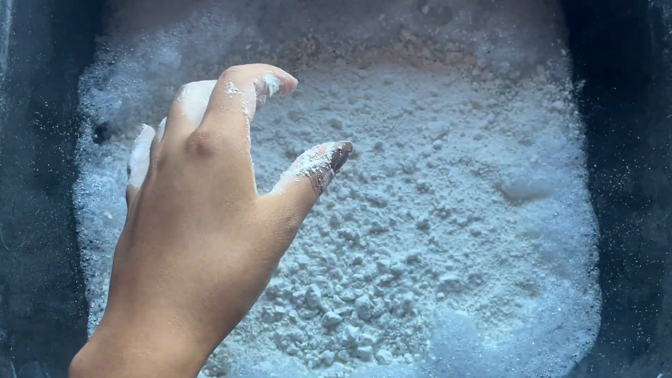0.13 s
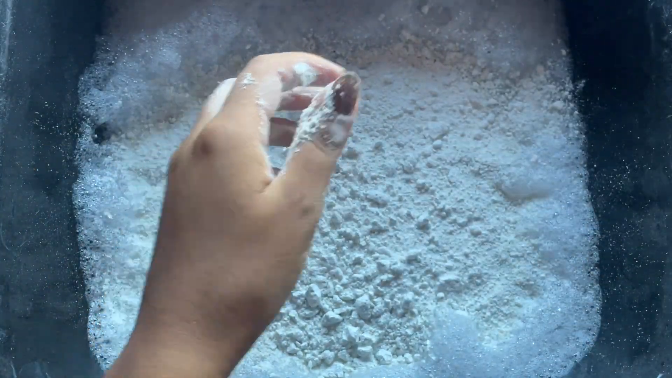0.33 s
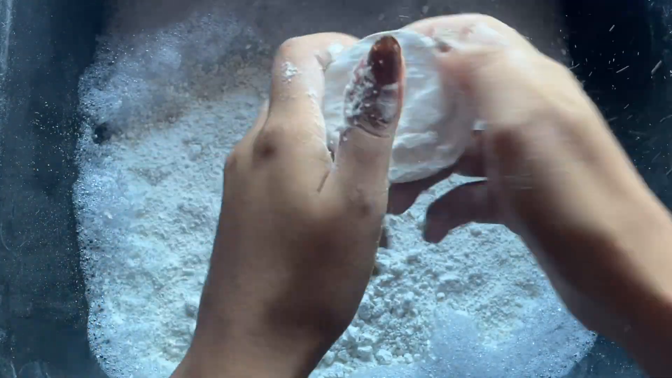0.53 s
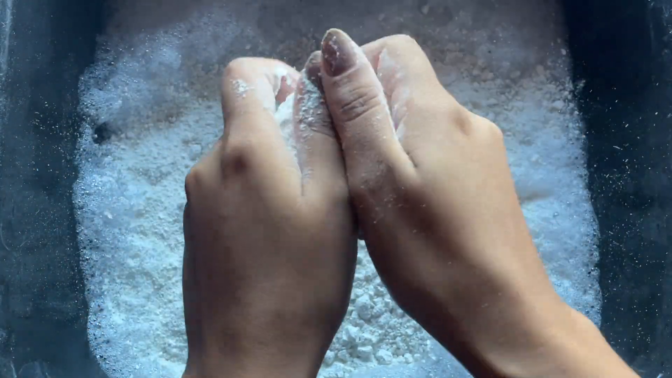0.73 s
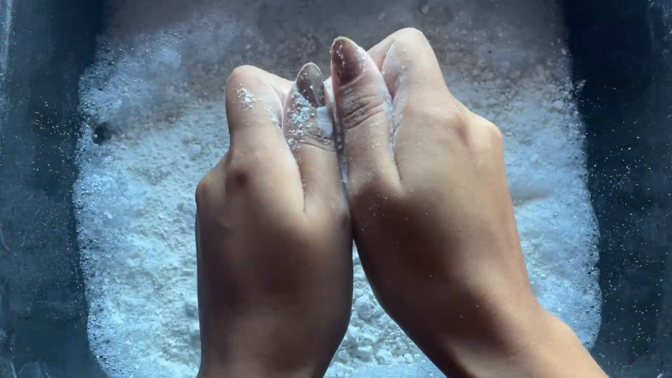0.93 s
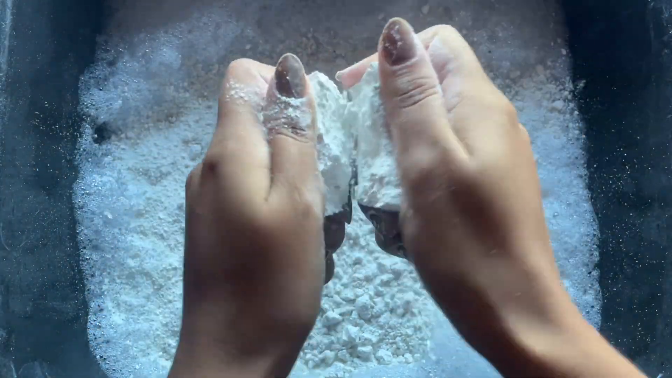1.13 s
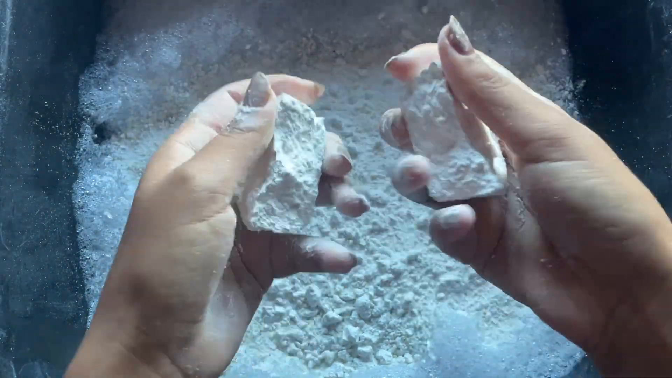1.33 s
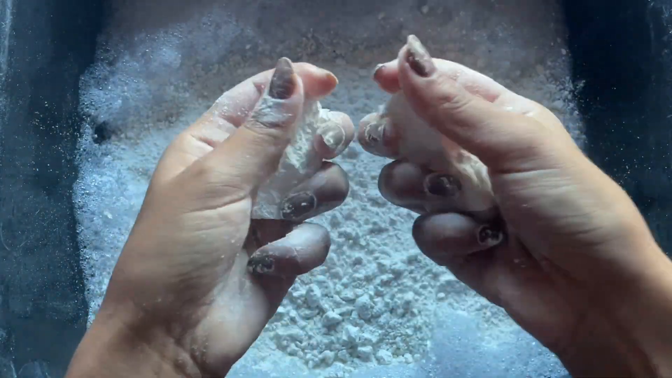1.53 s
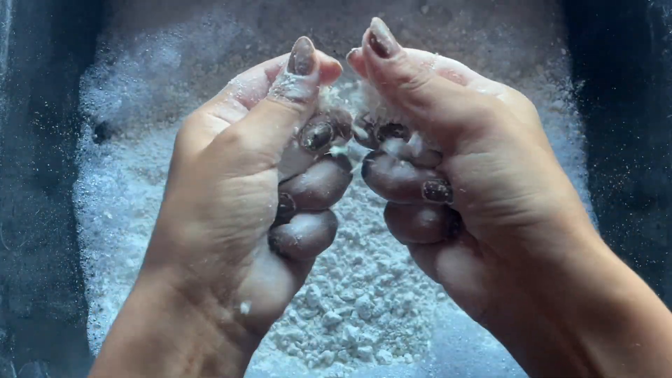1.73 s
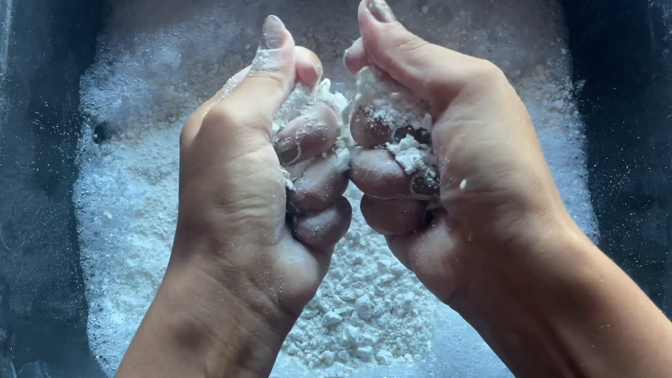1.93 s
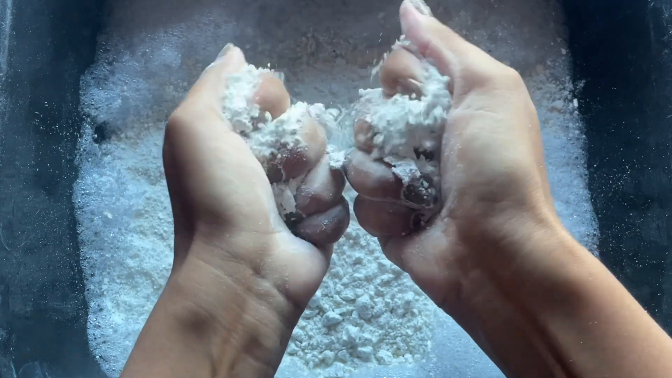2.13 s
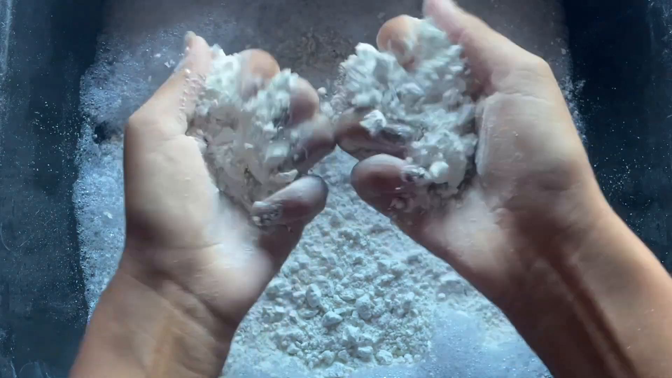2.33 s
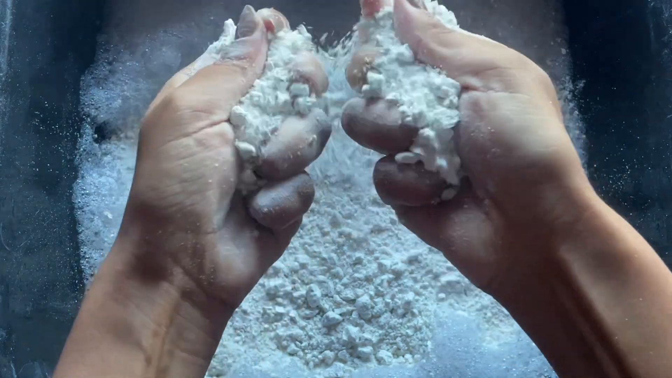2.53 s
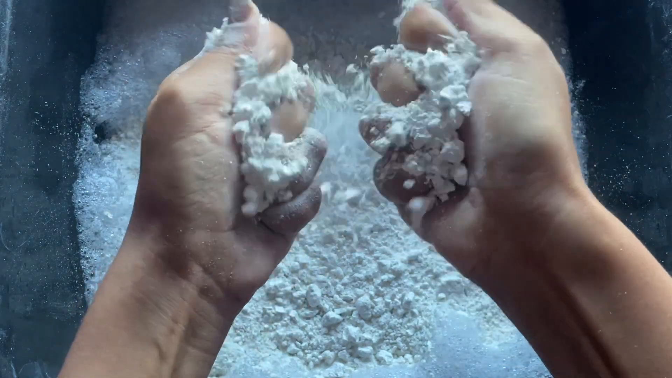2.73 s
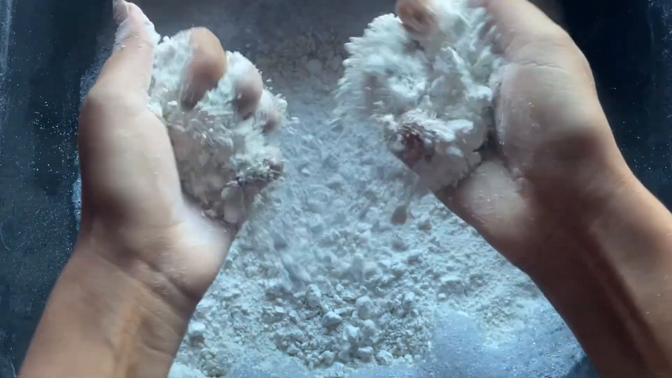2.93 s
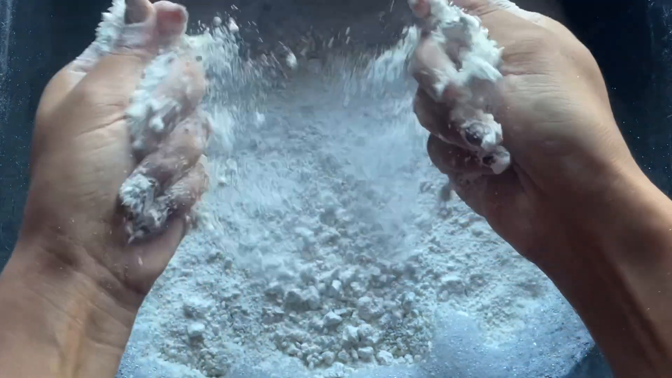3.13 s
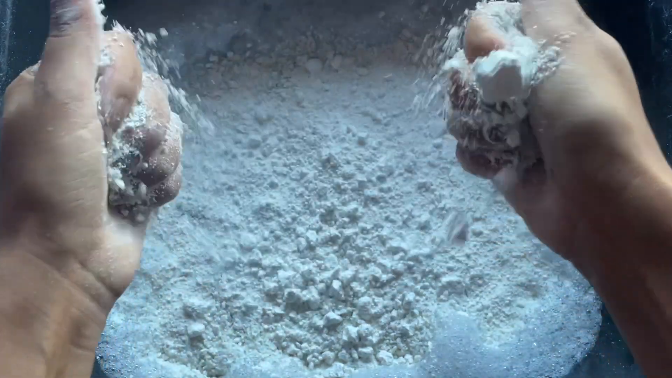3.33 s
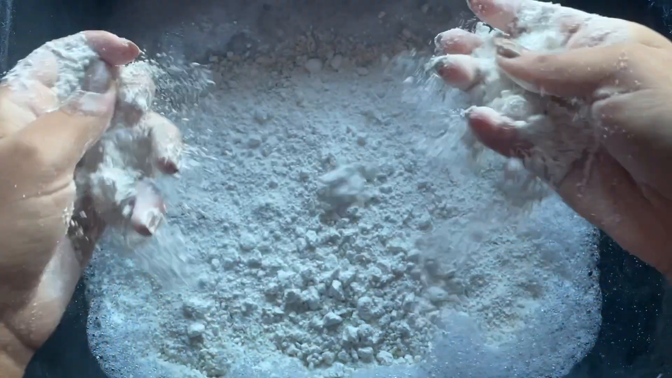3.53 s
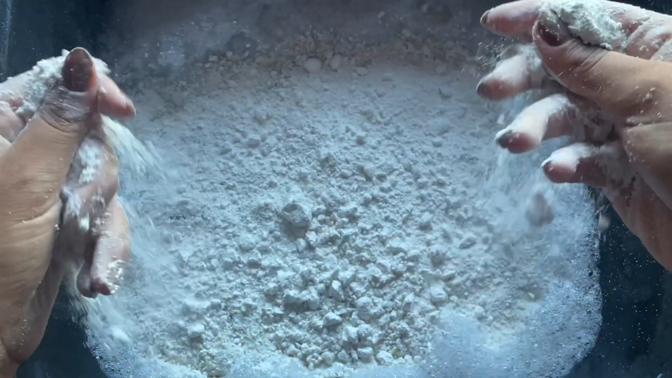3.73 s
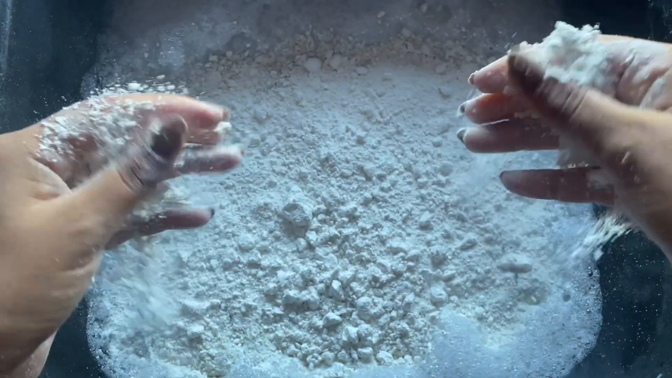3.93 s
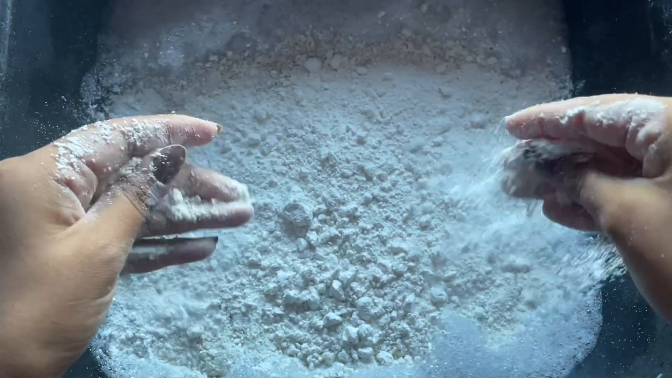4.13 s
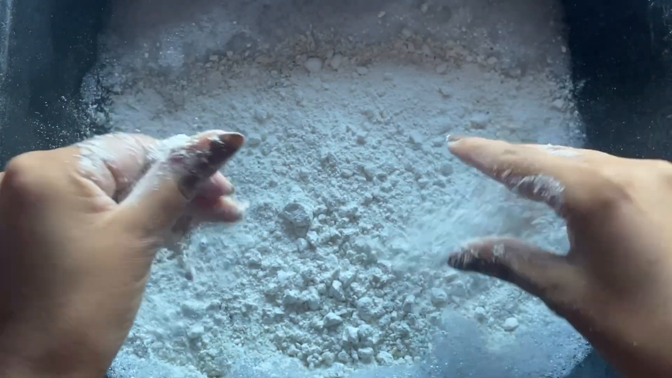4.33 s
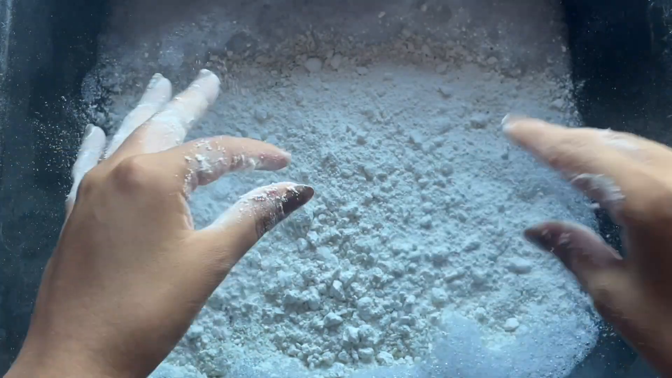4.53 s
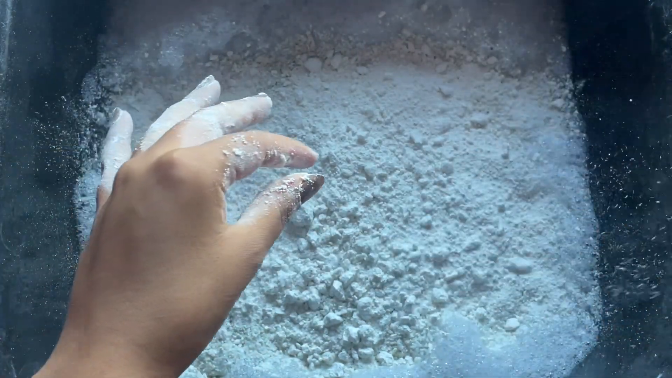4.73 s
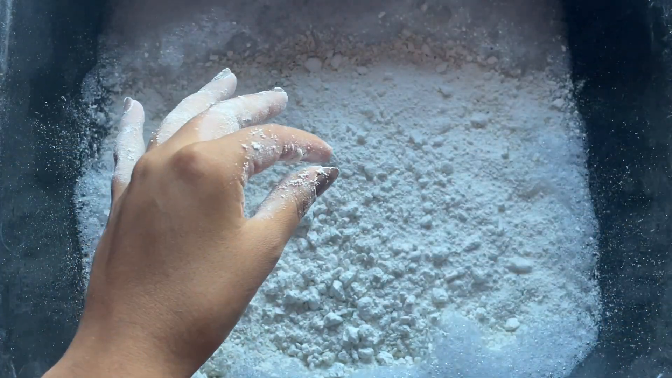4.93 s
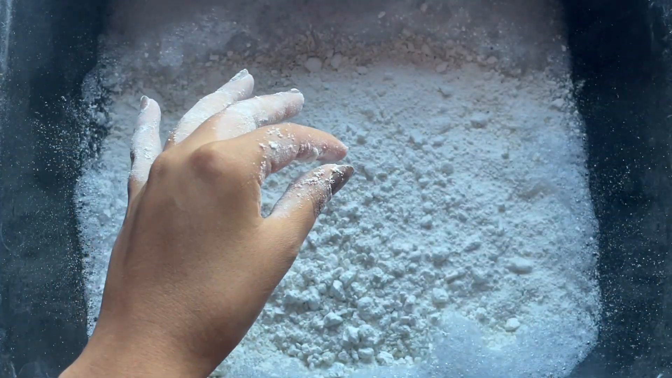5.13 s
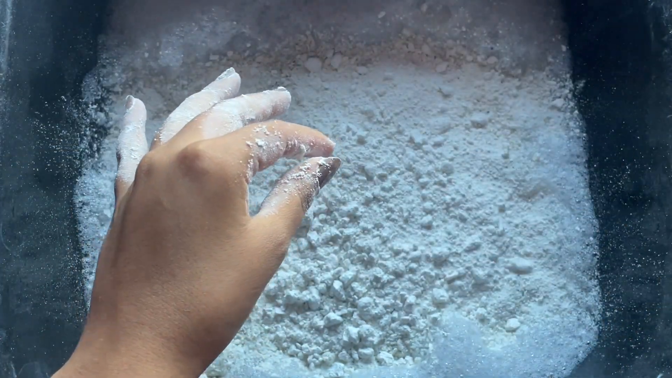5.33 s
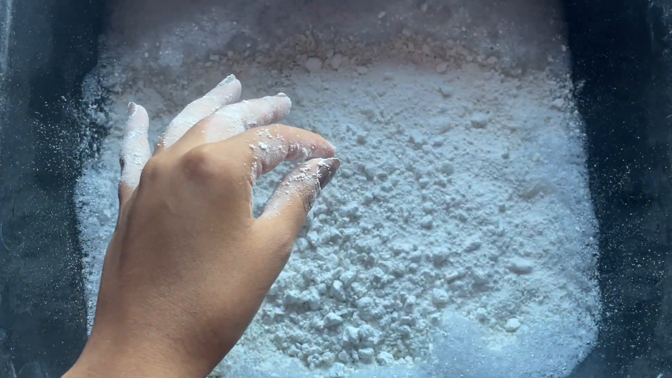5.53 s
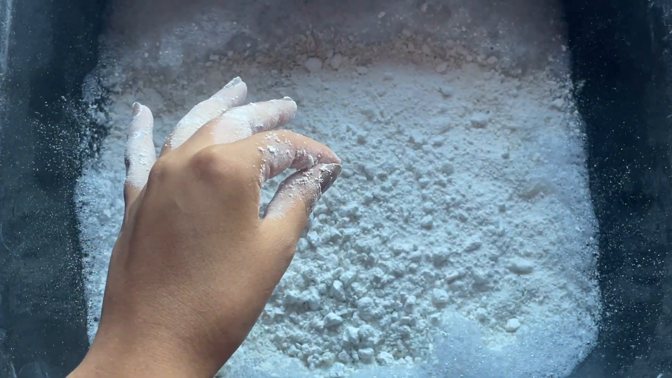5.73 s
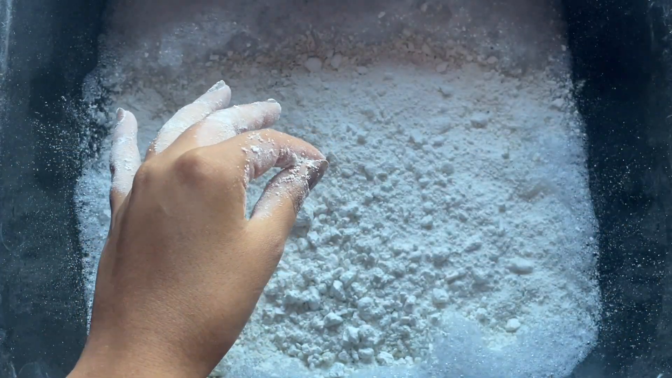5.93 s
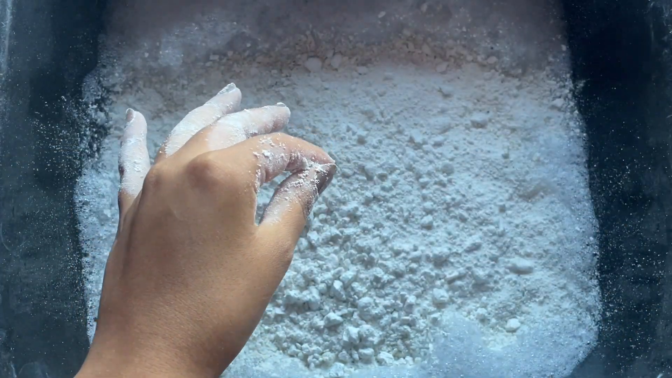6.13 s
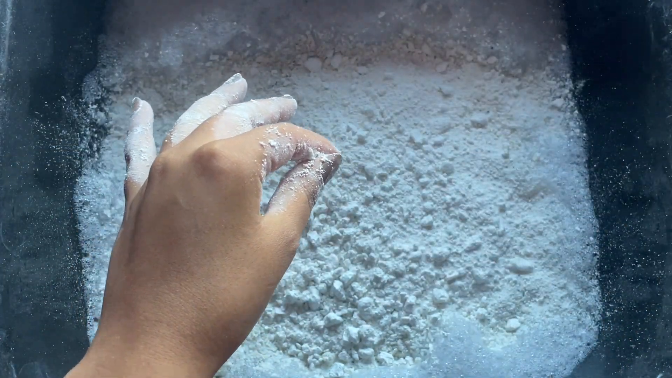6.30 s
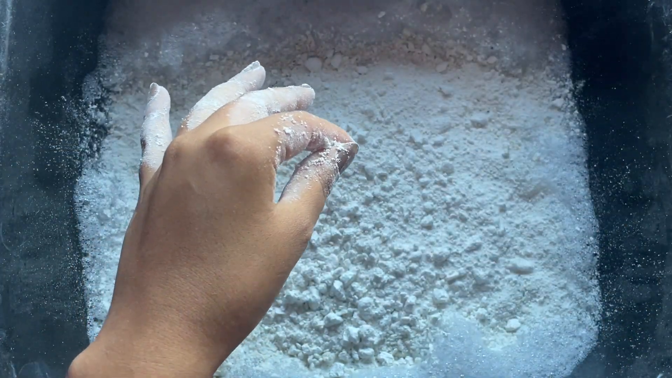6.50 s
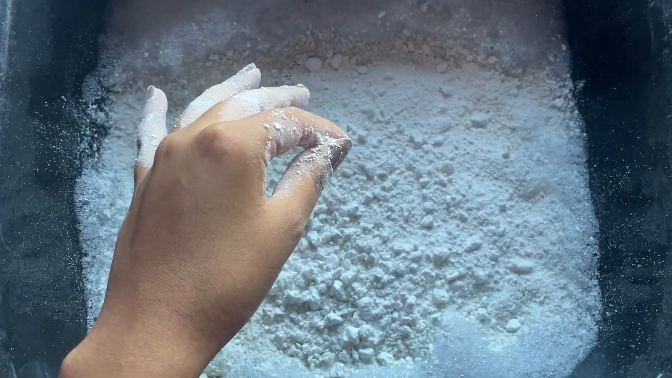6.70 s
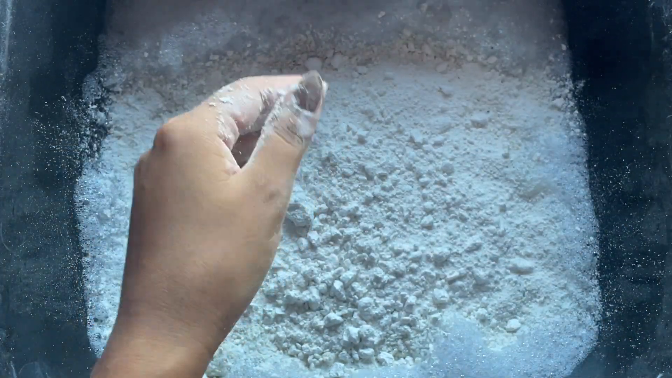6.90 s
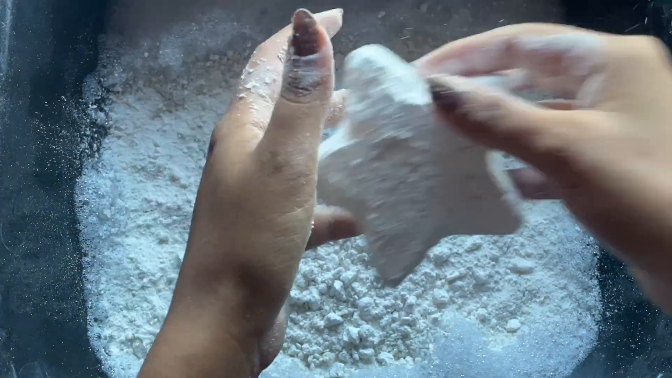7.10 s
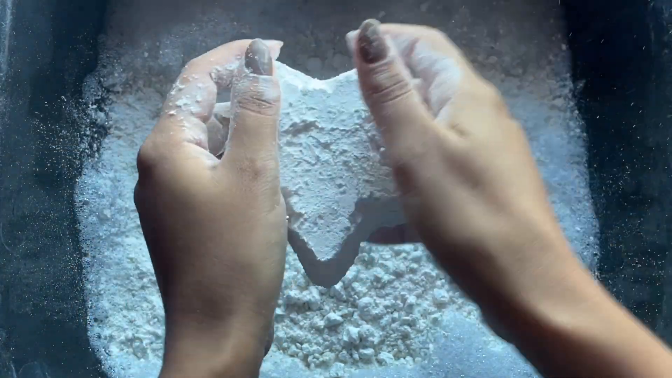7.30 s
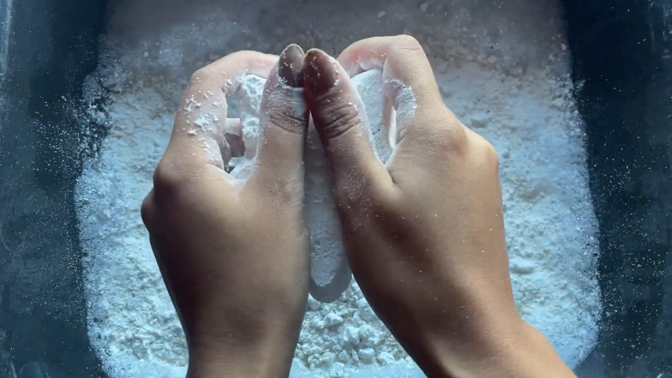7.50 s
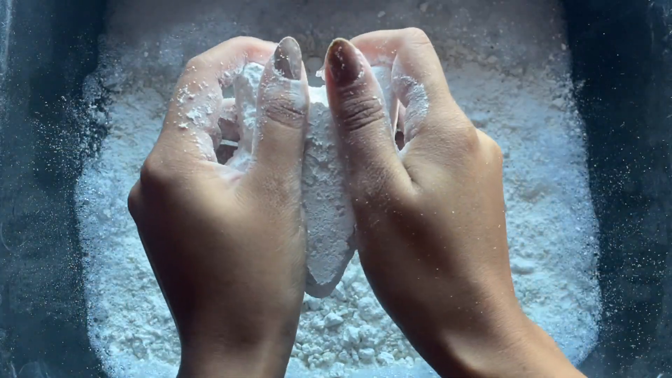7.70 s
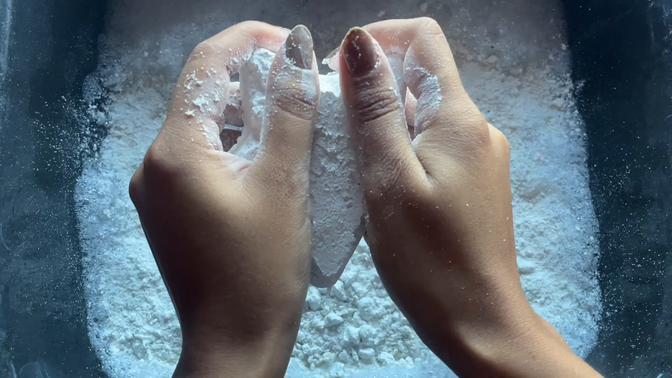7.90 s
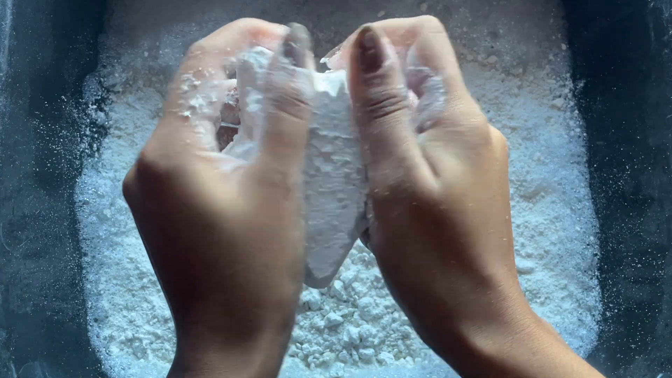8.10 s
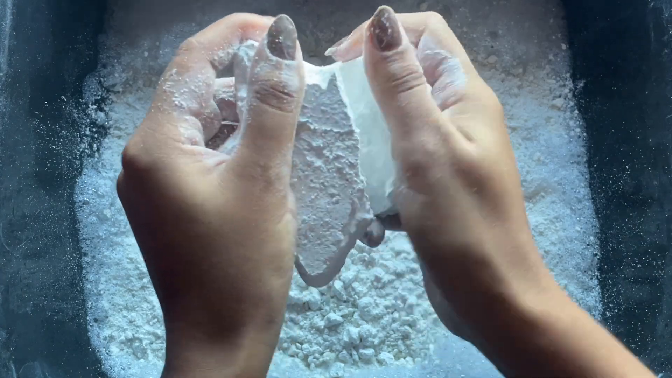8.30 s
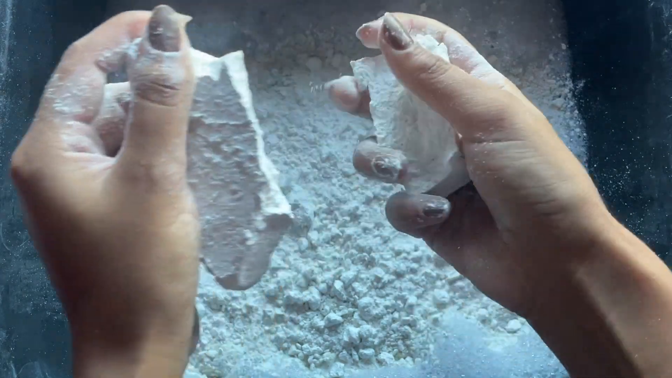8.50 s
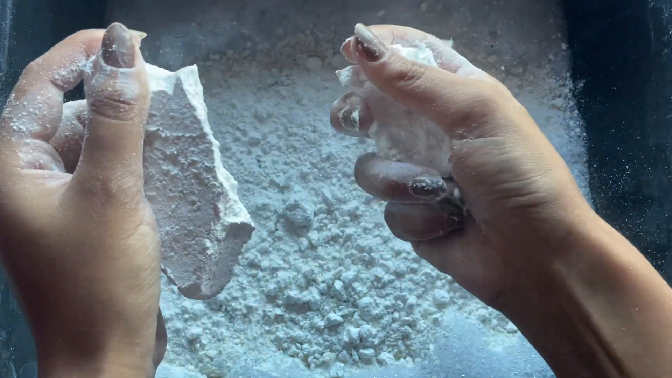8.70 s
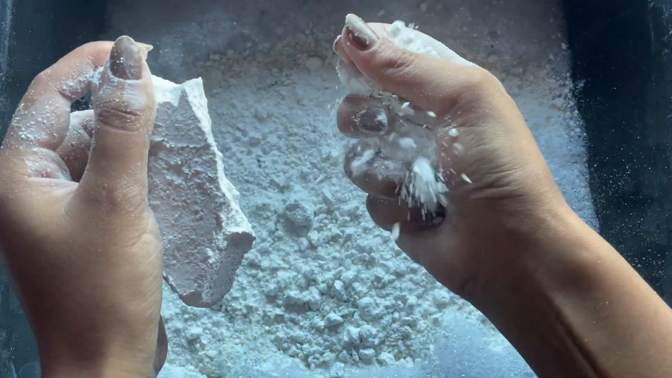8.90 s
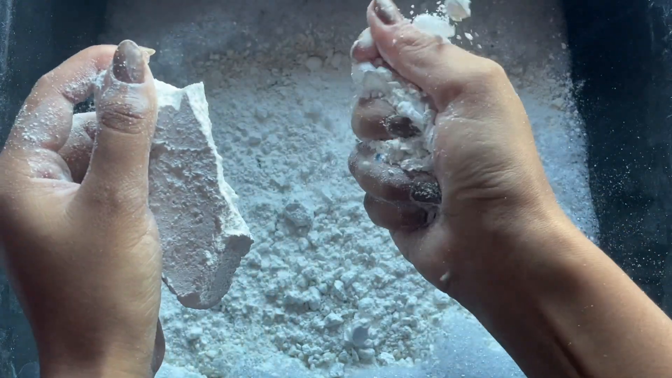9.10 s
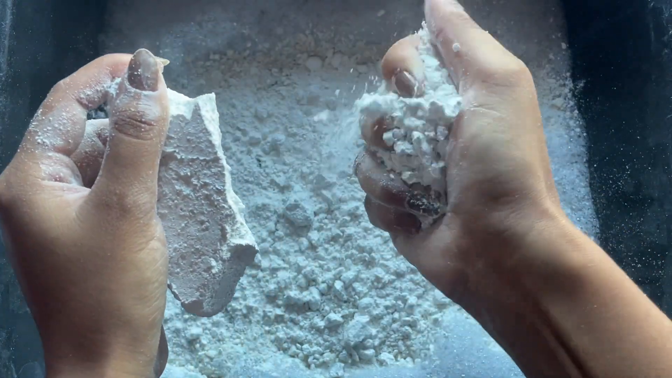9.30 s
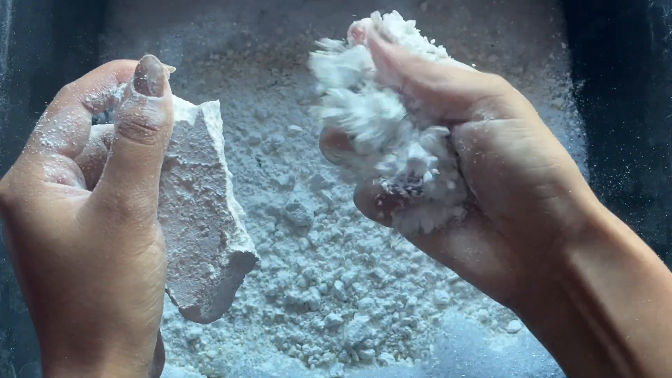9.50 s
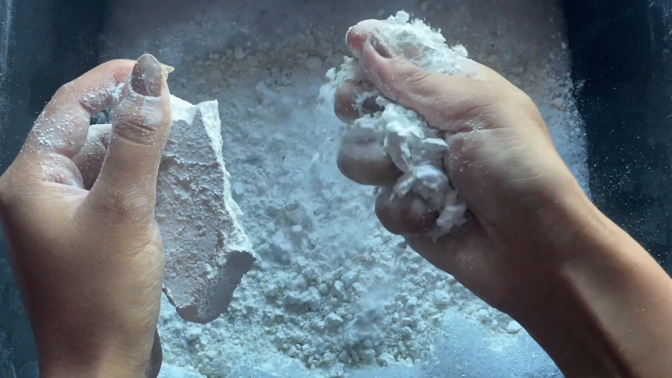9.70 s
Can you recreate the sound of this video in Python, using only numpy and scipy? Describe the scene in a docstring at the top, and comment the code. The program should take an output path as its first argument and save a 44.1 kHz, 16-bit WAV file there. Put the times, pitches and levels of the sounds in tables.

```python
"""Foamy paste fizzes in a tub over a faint tremble, with muffled rubs and soft thumps of handling at the tub.
Two hands squeeze crunching powder, then snap slabs of it: each snap is a burst of tiny fractures and a knock.
Lesser cracks and crumbs tick, hard pieces clink, dust whispers, clumps cave in, powder hisses into the foam.
Grains are filtered random clicks, knocks and thumps are swelling sines; it is all close, in a small room."""
import sys
import numpy as np
from scipy import signal
from scipy.fft import rfft, irfft
from scipy.io import wavfile
from scipy.ndimage import uniform_filter1d

SR = 44100
rng = np.random.default_rng(int(sys.argv[2]) if len(sys.argv) > 2 else 0)


def to_wav(s):
    """Save 16-bit WAV."""
    ch = np.atleast_2d(s).T  # columns
    pcm = np.round(np.clip(ch, -1, 1) * 32767)  # PCM
    wavfile.write(sys.argv[1], SR, pcm.astype(np.int16))


N = 429975
TIME = np.arange(N) / SR

# Colour of fine grit and bursting bubbles. Each row: frequency in Hz, gain in dB.
FIZZ_COLOUR = [(150, -4), (500, -3.5), (900, -4.5), (1400, 2), (2100, 4.5), (2700, 3), (3500, 0.5),
               (5000, -5.5), (6300, -12.5), (7500, -20), (10000, -27.5), (13000, -62)]
# Colour of breaking and shearing powder. Each row: frequency in Hz, gain in dB.
CRACK_COLOUR = [(120, -1), (600, 6), (1250, 3), (2000, 3), (3000, 1), (4500, -0.5), (6000, -4.5),
                (7500, -13), (10000, -20.5), (13000, -36)]
# Share of sound that reaches the two ports unrelated. Each row: frequency in Hz, side minus mid in dB.
WIDTH = [(60, -18.5), (200, -12), (600, -7.5), (1300, -7), (2600, -13.5), (5000, -27), (12000, -10)]

BUILD_UP_S = .005  # room for the small cracks before a main break
KNOCK_CYCLES = 0.7  # cycles that a knock takes to reach its peak


def undb(db):
    """Decibels to gain."""
    return 10 ** (np.asarray(db) / 20)


def unit(x):
    """Scale to rms 1."""
    return x / np.sqrt(np.mean(x ** 2) + 1e-20)


def curve(rows):
    """A control joined by straight lines in time."""
    return np.interp(TIME, *np.transpose(rows))


def colour(x, points, size=4096):
    """Causal minimum-phase filter through (Hz, dB) points, built by folding the cepstrum."""
    hz, db = np.transpose(points)
    bins = np.maximum(np.arange(size // 2 + 1) * SR / size, 1)
    gain_db = np.interp(np.log(bins), np.log(hz), db)
    cepstrum = irfft(np.log(undb(gain_db)))
    cepstrum[1:size // 2] *= 2
    cepstrum[size // 2 + 1:] = 0
    impulse = irfft(np.exp(rfft(cepstrum)))
    return signal.fftconvolve(x, impulse)[:len(x)]


def resonate(x, hz, q):
    """One resonance, gain 1 at its centre."""
    return signal.lfilter(*signal.iirpeak(hz, max(q, 1), fs=SR), x)


def add(track, s, sound):
    """Mix a sound in at time s."""
    start = max(int(s * SR), 0)
    part = sound[:max(N - start, 0)]
    track[start:start + len(part)] += part


def walk(rate):
    """Random levels, rate new ones a second, joined by slews; rms 1."""
    hold = max(int(SR / rate), 1)
    levels = np.repeat(rng.standard_normal(N // hold + 1), hold)
    return unit(uniform_filter1d(levels, hold)[:N])


def grains(rate, spread_db):
    """Random clicks of either sign, about rate a second, with sizes scattered in dB; rms 1."""
    sizes = undb(spread_db * np.clip(rng.standard_normal(N), -2.5, 2.5))
    struck = rng.random(N) < rate / SR
    return unit(struck * sizes * rng.choice([-1, 1], N))


def pings(rate, spread_db, centre_hz, octaves, cycles):
    """Random pops that each ring for a few cycles at a pitch of their own; rms 1."""
    out, t = np.zeros(N), TIME[:SR // 100]
    for when, size, pitch in rng.random((int(rate * N / SR), 3)):
        hz = min(centre_hz * 2 ** (octaves * (pitch - .5)), SR / 4)
        pop = np.exp(-t * hz / cycles) * np.sin(2 * np.pi * hz * t)
        add(out, when * N / SR, undb(spread_db * size ** 2) * pop)
    return unit(out)


def spread(source):
    """A source scattered over the tub: one draw common to both ports, one opposed."""
    mid, side = source(), colour(source(), WIDTH)
    return np.array([mid + side, mid - side])


def gestures(rows, attack_s, release_s):
    """Gain of overlapping (s, length s, dB) moves: each rises, holds for its length and dies away."""
    power = np.zeros(N)
    for s, length, db in rows:
        rise = np.clip((TIME - s) / attack_s, 0, 1)
        fall = np.exp(-np.maximum(TIME - s - length, 0) / release_s)
        power += (undb(db) * rise * fall) ** 2
    return np.sqrt(power)


def foam():
    """Bubbles burst in flurries: a bed of tiny ones and a scatter of larger pops, each with its own pitch."""
    # Drift of the fizz. Each row: time in seconds, level in dB.
    fizz_level = [(0, -55.5), (4.9, -53.5), (5.4, -56), (7.4, -56), (7.8, -59.5), (8.2, -56.5), (9.75, -57)]
    flurry = undb(1.1 * walk(rate=24) + 1.7 * walk(rate=140))

    def bubbles():
        """One draw of the tiny bubbles and the larger pops."""
        tiny = unit(colour(grains(rate=2200, spread_db=4.0), FIZZ_COLOUR))
        pops = pings(rate=130, spread_db=26.0, centre_hz=2810, octaves=1.72, cycles=1.9)
        return unit(tiny + undb(-10.5) * pops)
    return spread(bubbles) * flurry * undb(curve(fizz_level))


def hiss():
    """Steady microphone hiss: coloured noise, the same at both ports."""
    # Each row: frequency in Hz, gain in dB.
    hiss_colour = [(1000, 12), (10500, -2), (13000, -13)]
    return undb(-74.5) * colour(rng.standard_normal(N), hiss_colour)


def rumble(grip):
    """The low, uneven tremble of the tub under the handling, stronger while the hands squeeze."""
    # Each row: frequency in Hz, gain in dB.
    rumble_colour = [(20, -31), (40, -2.5), (65, 2.5), (100, -7.5), (170, -13.5), (300, -20), (700, -27.5),
                     (6000, -85)]
    rest_db, squeeze_share_db, waver_db = -55, -3, 2.5
    waver = undb(waver_db * walk(rate=10.0))
    strength = np.hypot(undb(rest_db), undb(squeeze_share_db) * grip)
    tremble = spread(lambda: unit(colour(rng.standard_normal(N), rumble_colour)))
    return tremble * strength * waver


def rubs():
    """Irregular slips shake a hollow body, duller for a softer contact; dusty skin scuffs on top."""
    # Skin sticking and slipping. Each row: start in seconds, length in seconds, relative level in dB,
    # brightness corner in Hz, relative level of the dry scuff in dB.
    rub_rows = [(0.01, 0.057, -50.5, 240, -55.5), (0.599, 0.098, -75, 1100, -55),
                (5.568, 0.074, -41, 447, -57), (5.63, 0.023, -36.5, 500, -63.5),
                (5.654, 0.034, -47.5, 420, -55), (5.681, 0.07, -54, 190, -86),
                (6.238, 0.18, -54, 300, -61.5), (6.389, 0.14, -54, 380, -53.5),
                (6.587, 0.085, -43, 800, -52), (6.599, 0.22, -56.5, 400, -64.5),
                (7.165, 0.19, -48, 153, -68), (7.401, 0.021, -44.5, 192, -61),
                (7.603, 0.03, -57.5, 600, -66), (9.19, 0.12, -47.5, 245, -77)]
    # The hollow body shaken by the rubs. Each row: frequency in Hz, gain in dB.
    body_colour = [(30, -45), (70, -1.5), (120, 2), (170, -7), (220, -13.5), (270, -9.5), (330, -2),
                   (410, -3), (500, -6.5), (700, -21), (3000, -33)]
    # The dry scuff. Each row: frequency in Hz, gain in dB.
    scuff_colour = [(300, 8), (700, 7), (1200, -2.5), (2300, 3), (3800, 0.5), (5500, -12), (8000, -25),
                    (13000, -47)]
    out = np.zeros(N)
    slips = colour(grains(rate=540, spread_db=1.5), body_colour)
    scuff = colour(grains(rate=1100, spread_db=4), scuff_colour)
    catches = undb(2 * walk(rate=70))  # the skin catches and lets go
    for s, length, db, corner_hz, scuff_db in rub_rows:
        part = slice(max(int(s * SR), 0), int((s + length) * SR))
        dull = signal.sosfilt(signal.butter(2, corner_hz, fs=SR, output="sos"), slips[part])
        stroke = signal.windows.tukey(len(dull), .65) * catches[part]
        add(out, s, undb(db) * unit(dull * stroke) + undb(scuff_db) * unit(scuff[part] * stroke))
    return out


def thumps():
    """A soft push swells and leaves the tub swinging for a few slow cycles."""
    # Soft bumps on the tub. Each row: start in seconds, level in dB, pitch in Hz.
    thump_rows = [(0.028, -35.5, 67), (2.356, -31, 63.5), (2.515, -32.5, 54.6), (4.069, -40, 66.5),
                  (4.524, -27.5, 61.4), (4.624, -32, 56.6), (4.697, -32.5, 50), (5.62, -27, 112.7),
                  (6.373, -35, 64.6), (6.616, -26, 72), (6.73, -36, 63.6), (7.158, -28, 77),
                  (7.196, -25.5, 71), (7.268, -21, 68), (7.405, -27.5, 51.3), (7.513, -33, 79),
                  (9.204, -22.5, 80.7), (9.236, -27, 83.4), (9.39, -35, 80), (9.447, -24, 68.4),
                  (9.526, -31.5, 58.5)]
    out, t = np.zeros(N), TIME[:SR // 4]
    peak_s = .024
    attack = (np.minimum(t - peak_s, 0) / 0.0047) ** 2
    decay = np.maximum(t - peak_s, 0) / 0.026
    swell = np.exp(-attack - decay)
    for s, db, hz in thump_rows:
        cycles = hz * (t + 0.0066 * (1 - np.exp(-t / 0.0027)))  # the pitch sags as the contact relaxes
        add(out, s, undb(db) * swell * np.sin(2 * np.pi * cycles))
    return out


def squeezes():
    """The hands close on the powder: gains of the muffled crunch (grip) and of the crackling grit."""
    # Each row: start in seconds, length in seconds, relative level of the muffled crunch in dB,
    # relative level of the grit crackling with it in dB.
    squeeze_rows = [(0.206, 0.55, -63, -62), (1.56, 0.61, -63, -58.5), (2.322, 0.61, -56, -57),
                    (2.954, 0.4, -54.5, -54.5), (3.507, 0.54, -54, -50.5), (4.25, 0.34, -60, -60),
                    (8.359, 0.28, -56.5, -56), (8.85, 0.47, -58, -59), (9.426, 0.39, -55, -50.5)]
    attack_s, release_s = 0.041, 0.086
    grip = gestures([(s, length, db) for s, length, db, _ in squeeze_rows], attack_s, release_s)
    grit = gestures([(s, length, db) for s, length, _, db in squeeze_rows], attack_s, release_s)
    return grip, grit


def crunch(grip, grit):
    """Packed powder shears in jerks, lumps give way with dull pocks in the hand and crumbs crackle."""
    # The packed powder. Each row: frequency in Hz, gain in dB.
    crunch_colour = [(100, -15), (250, -8.5), (420, 6), (600, -0.5), (850, -9.5), (1500, -16), (4000, -44),
                     (12000, -75)]
    jerks = undb(1.3 * walk(rate=24) + 1.8 * walk(rate=110))
    packed = spread(lambda: unit(colour(grains(rate=900, spread_db=1.0), crunch_colour)))
    lumps = spread(lambda: pings(rate=110, spread_db=4, centre_hz=456, octaves=0.92, cycles=6.1))
    fine = spread(lambda: unit(colour(grains(rate=2000, spread_db=3), FIZZ_COLOUR)))
    crumbs = spread(lambda: pings(rate=380, spread_db=9, centre_hz=2140, octaves=2.27, cycles=1.3))
    muffled = (packed + lumps) * grip * undb(-4.0)
    crackle = (undb(-1.0) * fine + undb(-4.5) * crumbs) * grit
    return (muffled + crackle) * jerks


def clinks():
    """Hard dry pieces meet sharply, chatter for a moment and ring in broad resonances, like soft pottery."""
    # Each row: start in seconds, relative level in dB, pitch as a multiple of the piece's resonances.
    clink_rows = [(0.5344, -28, 1.0), (0.579, -39.5, 1.06), (8.858, -30, 1.18)]
    # The broad resonances of a dry piece. Each row: frequency in Hz before the pitch multiple, gain in dB.
    piece_colour = [(300, -22), (700, -7), (1200, -35), (1650, -17), (1950, 3), (2300, 5), (2600, -1),
                    (2850, -3.5), (3600, -9.5), (5000, -25), (12000, -59)]
    out, t = np.zeros(N), TIME[:SR // 5]
    for s, db, pitch in clink_rows:
        contacts = grains(rate=1600, spread_db=-0.5)[:len(t)] * np.exp(-t / 0.0085)
        contacts[0] = undb(25)  # the first hard touch
        pitched = [(hz * pitch, gain) for hz, gain in piece_colour]
        add(out, s, undb(db + 6.5) * colour(contacts, pitched))
    return out


def fracture(length_ms, splinter_db, lead_ms):
    """Uneven micro-fractures build up to one main break, then die away; energy 1."""
    ms = 1000 * (TIME[:SR // 20] - BUILD_UP_S)
    steps = rng.choice([-1, 1], len(ms)) * undb(rng.uniform(-12, 12, len(ms)))
    build_up = np.minimum(ms, 0) / max(lead_ms, .1)
    decay = np.maximum(ms, 0) / max(length_ms, .3)
    burst = steps * np.exp(build_up - decay)
    burst *= undb(splinter_db) / np.linalg.norm(burst)
    burst[np.argmin(np.abs(ms))] -= 1  # the main break
    return burst / np.linalg.norm(burst)


def swing(t, hz):
    """A knock that swells and is damped by the fingers within a few cycles."""
    age = t * hz / KNOCK_CYCLES
    return age * np.exp(1 - age) * np.sin(2 * np.pi * hz * t)


def snaps():
    """A slab cracks, rings at two pitches, knocks and jolts the hands; lesser cracks and crumbs only tick."""
    # Slabs and clumps breaking. Each row: main break in seconds, relative crack level in dB, relative
    # knock level in dB, knock pitch in Hz, length of the fracture burst in ms,
    # lower ring of the piece in Hz, upper ring in Hz.
    snap_rows = [(1.012, -23, -32, 352, 0.51, 1200, 2700), (1.5584, -18, -34.5, 395, 0.74, 1140, 3600),
                 (1.5854, -18, -35, 400, 1.1, 1320, 3530), (1.631, -22.5, -42.5, 386, 1.2, 1450, 3100),
                 (1.896, -30, -49, 620, 0.8, 1260, 1900), (8.108, -21, -31.5, 360, 3.2, 1940, 3220),
                 (8.689, -9, -38.5, 480, 1.24, 2080, 4300), (8.725, -10.5, -27, 580, 0.86, 2170, 3500),
                 (8.8564, -10.5, -61, 650, 6.4, 2130, 3920), (9.128, -30, -39, 444, 3, 950, 3500),
                 (9.145, -22, -47, 516, 0.25, 1870, 5330)]
    # Brief cracks without a knock: crumbs giving way, and smaller or second breaks of slabs.
    # Each row: time in seconds, relative level in dB.
    tick_rows = [(1.089, -33.5), (1.571, -22), (1.647, -36), (1.667, -29.5), (1.673, -28), (1.749, -27),
                 (5.108, -34), (6.002, -36.5), (6.603, -28.5), (7.433, -31.5), (8.258, -33.5), (8.789, -25),
                 (8.8592, -16), (8.902, -22.5), (9.179, -21), (9.2536, -30.5), (9.299, -30.5),
                 (9.4865, -34), (9.5491, -27.5), (9.599, -33), (9.672, -28)]
    # the jolt of the hands; it weakens steeply for pieces that knock above heavy_hz
    thud_hz, thud_db, heavy_hz = 155, -13, 347
    cracks, knocks, t = np.zeros(N), np.zeros(N), TIME[:SR // 10]
    for s, crack_db, knock_db, hz, length_ms, lower_hz, upper_hz in snap_rows:
        # a slow break builds up for longer and splinters more; a quick one is closer to a single crack
        splinter_db = 7 * np.log10(max(length_ms, .1))
        burst = fracture(length_ms, splinter_db, lead_ms=min(.7 * length_ms, 1.1))
        rung = 2.4 * resonate(burst, lower_hz, q=5.3) + 1.0 * resonate(burst, upper_hz, q=1.8)
        add(cracks, s - BUILD_UP_S, undb(crack_db + 10.0) * (burst + rung))
        thud = undb(thud_db) * min(heavy_hz / hz, 1) ** 6 * swing(t, thud_hz)
        add(knocks, s + 0.0013, undb(knock_db + 7.5) * (swing(t, hz) + thud))
    for s, db in tick_rows:
        burst = fracture(length_ms=1.3, splinter_db=2, lead_ms=.5)
        rung = 2 * resonate(burst, rng.uniform(1900, 3200), q=2)  # each at its own pitch
        add(cracks, s - BUILD_UP_S, undb(db + 7.5) * (burst + rung))
    return colour(cracks, CRACK_COLOUR) + knocks


def dust():
    """The finest grains slide off pieces and fingers with a thin, high whisper."""
    # Dry dust sifting. Each row: start in seconds, length in seconds, level in dB.
    sift_rows = [(1.24, 0.075, -63.5), (1.39, 0.031, -63), (3.6, 0.31, -60.5), (8.098, 0.013, -51)]
    # Each row: frequency in Hz, gain in dB.
    sift_colour = [(1000, -27), (4000, 1), (7000, 2.5), (10000, -2), (13000, -20)]
    flow = gestures(sift_rows, attack_s=0.017, release_s=0.012)
    return unit(colour(grains(rate=8600, spread_db=-4), sift_colour)) * flow


def collapses():
    """A clump caves in: a short shower of coarse grit over a dull pock from the hollow of the hand."""
    # Each row: start in seconds, length in seconds, grit level in dB, pock level in dB, pock pitch in Hz.
    collapse_rows = [(1.608, 0.081, -52, -54.5, 480), (1.931, 0.01, -63, -48.5, 400),
                     (2.509, 0.042, -50.5, -49, 480), (4.505, 0.017, -58, -51, 464),
                     (8.917, 0.025, -48.5, -54.5, 650), (9.199, 0.033, -48, -53.5, 500),
                     (9.278, 0.04, -48.5, -50, 620), (9.439, 0.083, -49.5, -59, 597)]
    out = np.zeros(N)
    grit = colour(grains(rate=1400, spread_db=0), FIZZ_COLOUR)
    shear = colour(grains(rate=1900, spread_db=2), CRACK_COLOUR)
    for s, length, grit_db, pock_db, hz in collapse_rows:
        part = slice(int(s * SR), int((s + length) * SR))
        stroke = signal.windows.tukey(len(grit[part]), .5)
        pock = resonate(resonate(shear[part], hz, q=1), hz, q=1)
        add(out, s, undb(grit_db) * unit(grit[part] * stroke) + undb(pock_db) * unit(pock * stroke))
    return out


def pour():
    """Countless fine grains land in the foam in uneven clumps; the heaviest fall makes the tub sing."""
    # Handfuls of powder let fall. Each row: start in seconds, length in seconds, level in dB.
    pour_rows = [(3.07, 0.28, -48), (3.54, 0.27, -46.5), (3.68, 0.2, -46.5), (4.02, 0.25, -47.5),
                 (4.38, 0.24, -50)]
    # Powder landing in the foam. Each row: frequency in Hz, gain in dB.
    pour_colour = [(150, -35), (420, -3.5), (900, -5.5), (1500, -2.5), (2200, -1.5), (2755, 1), (3500, -4),
                   (5000, -8.5), (7000, -15.5), (9000, -21.5), (13000, -51)]
    clumps = undb(1.3 * walk(rate=90) + .7 * walk(rate=18))
    flow = gestures(pour_rows, attack_s=0.089, release_s=0.19)
    fall = spread(lambda: unit(colour(grains(rate=2200, spread_db=1.0), pour_colour)))
    singing = resonate(fall, 1990, q=7.5) * flow / flow.max()
    return (fall + singing) * clumps * flow


def ring(modes, t):
    """Sum of decaying sine modes."""
    return sum(undb(db) * undb(-60 * t / t60) * np.sin(2 * np.pi * hz * t) for hz, db, t60 in modes)


def room(x, early_db, early_s, tail_db, tail_s, modes_db, width_db):
    """Quick echoes from the tub walls, a short diffuse tail and a few low room resonances."""
    # Colour of the echoes. Each row: frequency in Hz, gain in dB.
    room_colour = [(60, -16.5), (135, 12), (215, 7.5), (330, -0.5), (800, -1.5), (2200, -1.5), (5000, -4),
                   (12000, 4)]
    # Low room resonances. Each row: frequency in Hz, relative level in dB, time to fall by 60 dB in seconds.
    room_modes = [(290, 3, 0.47), (322.3, 3.5, 0.25), (370, 5, 0.15), (396, -9, 0.091)]
    t = TIME[:SR // 2]
    early = undb(early_db) * np.exp(-t / early_s)
    tail = undb(tail_db) * np.exp(-t / tail_s)
    fade = (early + tail) * (t > .0015)
    common = colour(rng.standard_normal(len(t)) * fade, room_colour) + undb(modes_db) * ring(room_modes, t)
    opposed = undb(width_db) * colour(colour(rng.standard_normal(len(t)) * fade, room_colour), WIDTH)
    return np.array([x + signal.fftconvolve(x, common + sign * opposed)[:N] for sign in (1, -1)])


def scene():
    """Rubs, clinks and breaking slabs in the room, over the foam, the powder and the tub."""
    grip, grit = squeezes()
    skin = undb(2) * room(rubs(), early_db=-33.0, early_s=0.0044, tail_db=-36.5, tail_s=0.027,
                          modes_db=-64, width_db=9)
    pieces = room(clinks(), early_db=-31, early_s=0.016, tail_db=-33, tail_s=0.033,
                  modes_db=-80, width_db=7)
    pan_db = 2  # left minus right
    pieces = pieces * undb(np.array([[pan_db], [-pan_db]]) / 2)
    slabs = room(snaps() + collapses(), early_db=-27.5, early_s=0.0034, tail_db=-37.5, tail_s=0.041,
                 modes_db=-65, width_db=5)
    tub = foam() + rumble(grip) + thumps()
    powder = crunch(grip, grit) + dust() + pour()
    return tub + hiss() + skin + pieces + slabs + powder


def record(dry):
    """Two microphone ports, the left slightly louder and out of phase in the treble; the top is cut."""
    # How the ports part in phase. Each row: frequency in Hz, lead of the left in radians.
    port_phase = [(0, 0), (1900, 0), (3000, .2), (5300, .05), (6900, -.9), (8200, -3.14), (10200, -5),
                  (11000, -6.2), (13000, -6.4)]
    top_hz = 13850
    hz = np.arange(N // 2 + 1) * SR / N
    lead = np.interp(hz, *np.transpose(port_phase))
    left = irfft(rfft(dry[0]) * np.exp(1j * lead), N)
    pair = np.array([left * undb(0.48), dry[1] * undb(-0.01)])
    return signal.sosfilt(signal.ellip(8, .2, 70, top_hz, fs=SR, output="sos"), pair)


dry = scene()
out = record(dry)
to_wav(out)
```